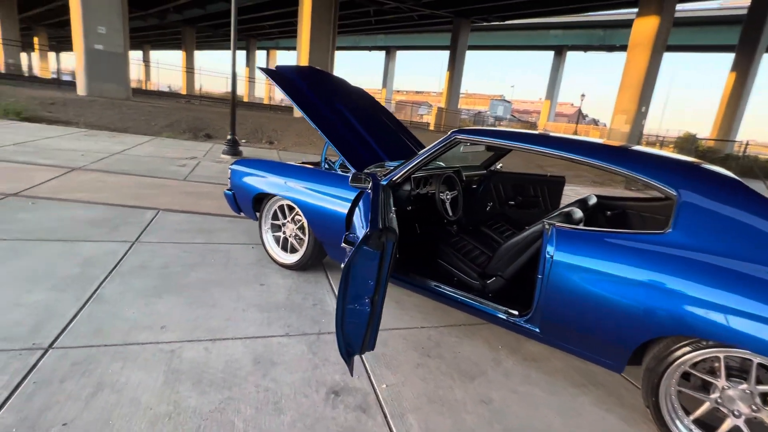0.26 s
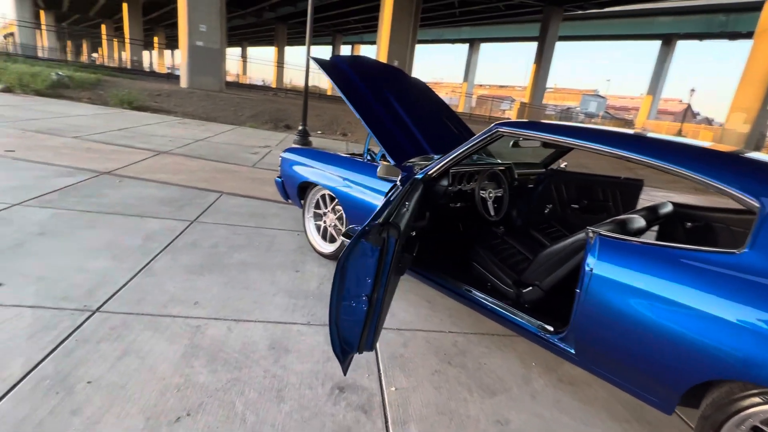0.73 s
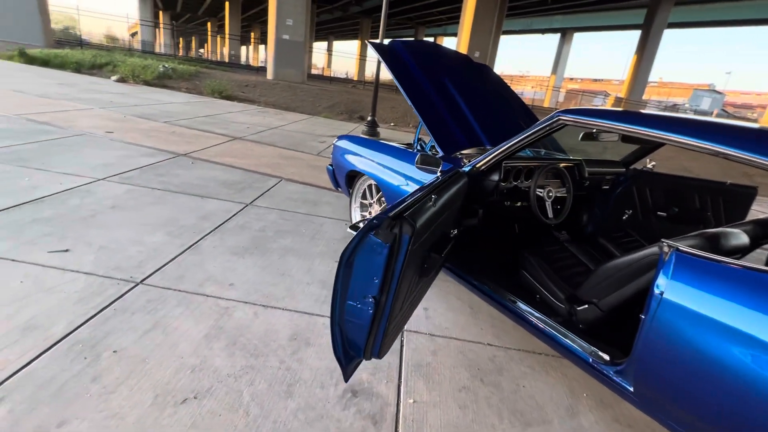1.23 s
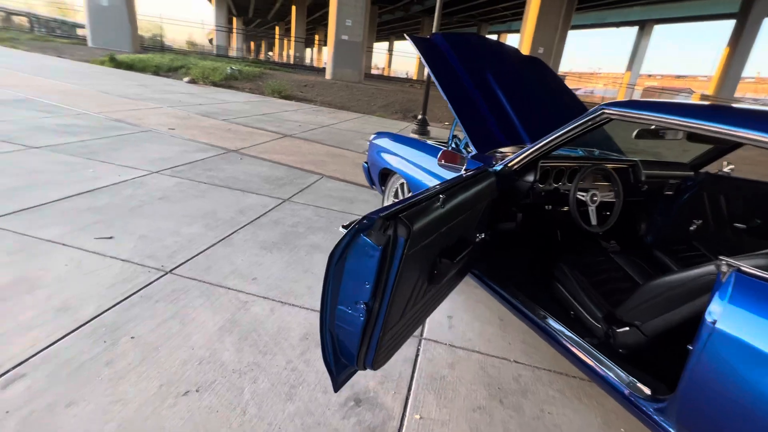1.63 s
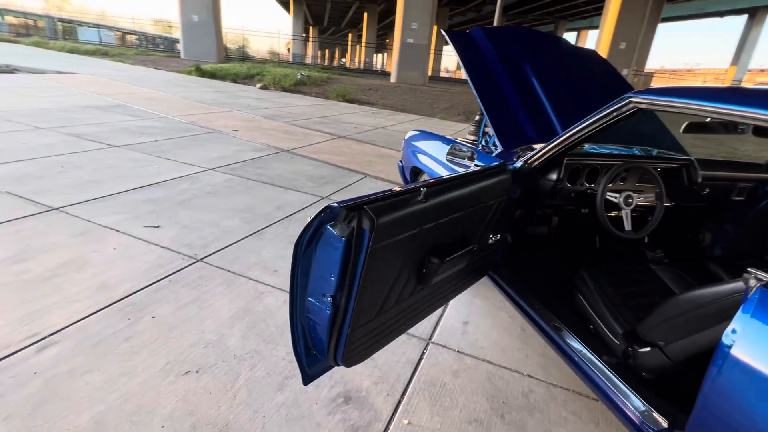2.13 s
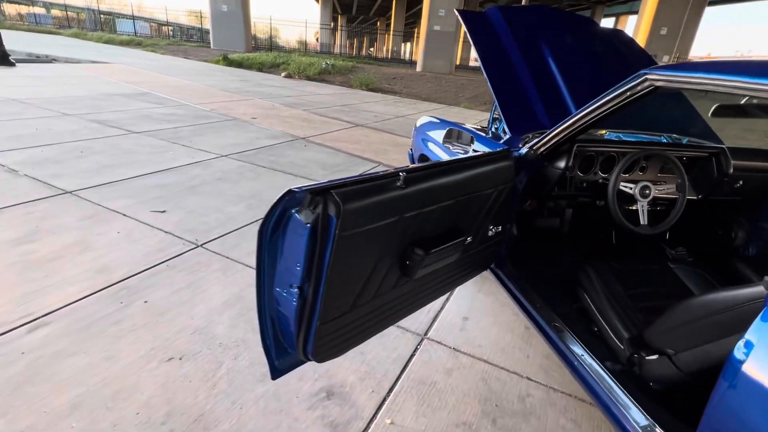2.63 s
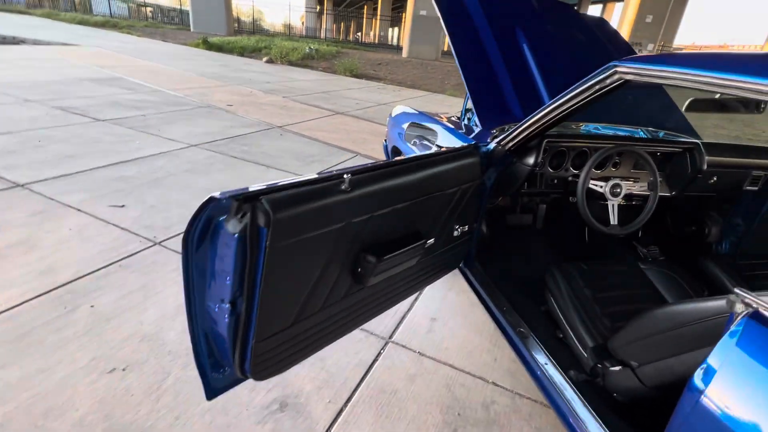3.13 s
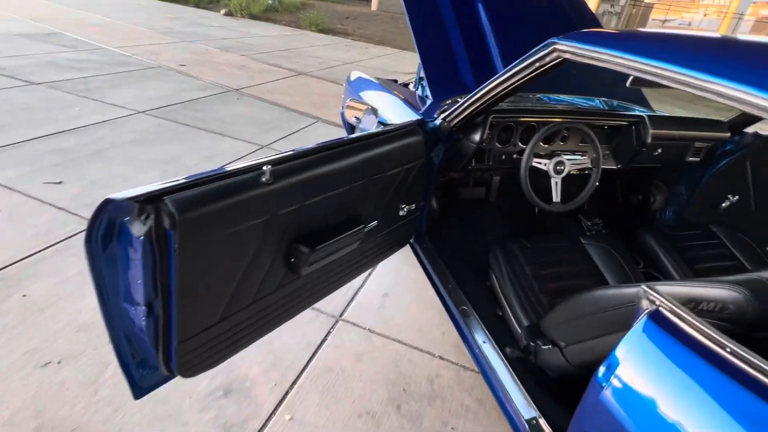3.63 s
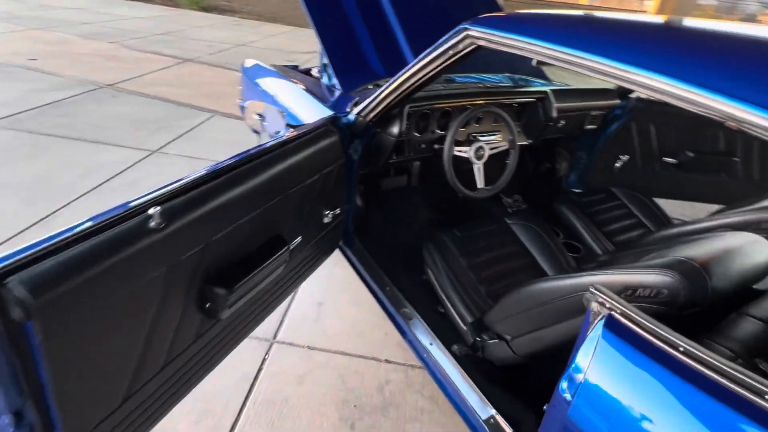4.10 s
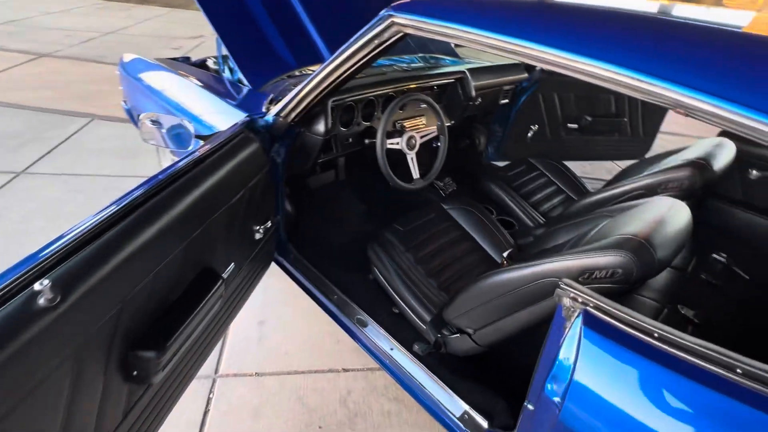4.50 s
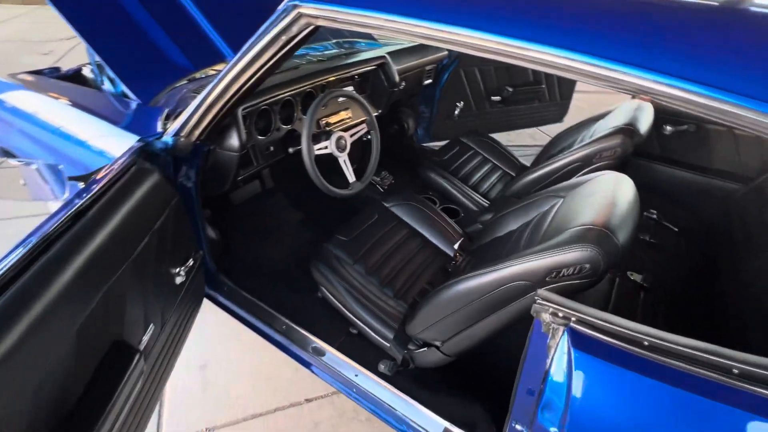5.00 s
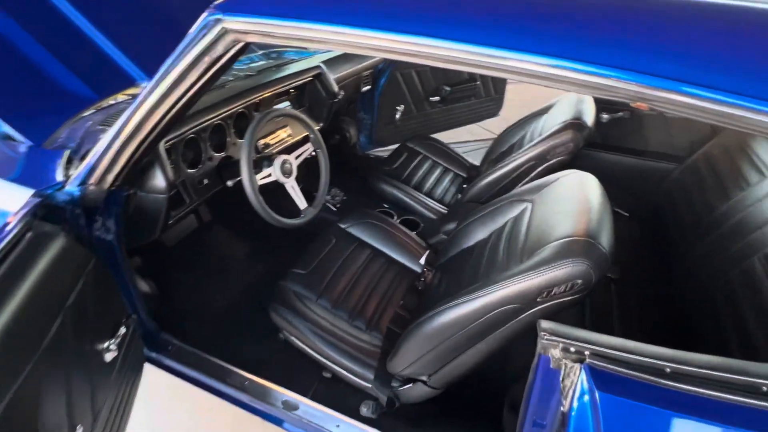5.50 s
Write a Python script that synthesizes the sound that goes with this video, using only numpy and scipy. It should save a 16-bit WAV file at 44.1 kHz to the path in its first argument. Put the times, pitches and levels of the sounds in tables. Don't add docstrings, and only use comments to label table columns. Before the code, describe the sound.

A bass-heavy, continuous roar of vehicles on a deck above, heard from the paved ground through a handheld stereo device. A quick double metallic clank comes early with a diffuse echo, then muffled slab booms, a singing tyre tone strongest near the middle, labouring diesel hum, a deep thud late on, and small handling ticks and cloth brushes.

```python
import sys
import numpy as np
from scipy import signal
from scipy.fft import rfft, irfft, next_fast_len
from scipy.io import wavfile
from scipy.ndimage import uniform_filter1d

SR = 44100
rng = np.random.default_rng(int(sys.argv[2]) if len(sys.argv) > 2 else 0)


def to_wav(s):
    ch = np.atleast_2d(s).T
    pcm = np.round(np.clip(ch, -1, 1) * 32767)
    wavfile.write(sys.argv[1], SR, pcm.astype(np.int16))


def ratio(d):
    e = np.asarray(d, float) / 20
    return 10 ** e


N = 253707

TIME = np.arange(N) / SR
SIZE = next_fast_len(N)
HZ = np.arange(SIZE // 2 + 1) * SR / SIZE + 1e-3


def level(x, db):
    return x * ratio(db) / np.sqrt(np.mean(x ** 2))


def curves(table):
    seconds, *columns = np.transpose(table)
    return [np.interp(TIME, seconds, column) for column in columns]


def over_hz(table):
    hz, value = np.transpose(table)
    return np.interp(np.log(HZ), np.log(hz), value)


def shape(x, gain):
    return irfft(rfft(x, SIZE) * gain, SIZE)[..., :N]


def bell(hz, width_hz):
    return 1 / (1 + 1j * (HZ ** 2 - hz ** 2) / (HZ * width_hz))


def walk(rate):
    hold = int(SR / rate)
    steps = np.repeat(rng.standard_normal(N // hold + 1), hold)
    return 1.3 * uniform_filter1d(uniform_filter1d(steps, hold), hold)[:N]


def swell(s, rise, fall):
    t = TIME - s
    return np.exp(np.where(t < 0, -(t / rise) ** 2, -t / fall))


def swells_db(rows, base_db):
    swells = sum(ratio(db) * np.exp(-((TIME - s) / length) ** 2) for s, db, length in rows)
    return 20 * np.log10(ratio(base_db) + swells)


def note(hz, db, waver_hz, beat_db, rate=12):
    phase = 2 * np.pi * np.cumsum(hz + waver_hz * walk(rate)) / SR
    return np.sqrt(2) * ratio(db + beat_db * walk(rate)) * np.sin(phase)


# frequency in Hz, correlation of left and right from 0 to 1.
PORT_LIKENESS = [(60, 0.96), (100, 1), (180, 0.92), (310, 0.49), (540, 0.34), (930, 0.05), (1600, 0.05),
                 (2770, 0.03)]


def wide_noise():
    like = np.clip(over_hz(PORT_LIKENESS), -.9, .999)
    mid = shape(rng.standard_normal(N), np.sqrt(1 + like))
    side = shape(rng.standard_normal(N), np.sqrt(1 - like))
    return np.array([mid + side, mid - side]) / 2


# frequency in Hz, density in dB per Hz.
TRAFFIC_SPECTRUM = [(15, -50), (28, -18.5), (49, -2), (87, -2.5), (175, -4), (280, -8.5), (450, -16),
                    (560, -20.5), (790, -17.5), (1600, -28), (3300, -46), (4200, -51.5), (8500, -61),
                    (11500, -88)]
# time in seconds, load in dB.
DECK_LOAD = [(0, -3.5), (.4, -5), (.55, 0.5), (.8, -1), (1.05, -0.5), (1.35, 0.5), (1.7, -3), (2.05, -2),
             (2.2, 0.5), (2.7, 1.5), (3.1, 2), (3.5, 1), (3.8, 0), (4.2, 0), (4.8, 0.5), (5.1, -0.5),
             (5.4, 0.2), (5.75, -2.5)]
PART_CENTRES = [55, 190, 1000, 5000]
PART_LOAD_SHARE = [.6, 1, 0.13, 0.12]
PART_HEAVE = [1.2, .6, .4, .4]


def traffic(flutter_db=0.8, gust_db=0.4):
    roar = level(shape(wide_noise(), ratio(over_hz(TRAFFIC_SPECTRUM))), -20.5)
    bins = rfft(roar, SIZE)
    load_db, = curves(DECK_LOAD)
    flow = np.array([share * load_db + heave_db * walk(7)
                     for share, heave_db in zip(PART_LOAD_SHARE, PART_HEAVE)])
    gust = walk(11)
    out = 0
    for octave in np.arange(4, 14.5, .5):
        overlap = np.clip(1 - 2 * np.abs(np.log2(HZ) - octave), 0, 1)
        band = irfft(bins * overlap, SIZE)[:, :N]
        parts = [np.interp(octave, np.log2(PART_CENTRES), one) for one in np.eye(len(PART_CENTRES))]
        treble = np.clip((octave - 8) / 4, 0, 1)
        band_db = parts @ flow + treble * gust_db * gust + flutter_db * walk(12)
        out = out + band * ratio(band_db)
    return out


# time in seconds, pitch in Hz.
TREAD_NOTE_PITCH = [(0, 229.9), (.8, 227.9), (1.3, 238.3), (2, 246.9), (2.9, 253.6), (3.4, 255.3),
                    (4.1, 256), (4.7, 258.7), (5.2, 239.7), (5.753, 224.5)]
# time in seconds, level in dB, length in seconds.
TREAD_NOTE_SWELLS = [(.52, -26, 0.045), (.75, -26, 0.096), (1.08, -31.5, 0.052), (1.21, -22.5, 0.041),
                     (1.3, -30, 0.044), (1.38, -29, 0.11), (1.67, -34, .04), (1.92, -43, .05),
                     (2.5, -33.5, .1), (2.78, -23, 0.046), (2.9, -17.5, .08), (3.14, -20, 0.035),
                     (3.28, -26, 0.06), (3.6, -31, 0.057), (4.1, -35, 0.073), (4.45, -27.5, .1),
                     (4.7, -33.5, .1), (5.05, -30, 0.011), (5.6, -34.5, .07)]
# time in seconds, level in dB, length in seconds.
TREAD_OCTAVE_SWELLS = [(.75, -41, .1), (1.28, -45, .08), (1.65, -43, .1), (2.07, -38, .15), (2.8, -42, .15),
                       (3.09, -34, .05), (3.28, -40, .1)]


def tread_note():
    hz, = curves(TREAD_NOTE_PITCH)
    fundamental = note(hz, swells_db(TREAD_NOTE_SWELLS, -36.5), 2.077, 1.2)
    octave_db = swells_db(TREAD_OCTAVE_SWELLS, -46)
    octave = np.array([note(2 * hz, octave_db, 5.0, 2.5) for _ in "LR"])
    return fundamental + octave


# time in seconds, pitch in Hz.
DIESEL_PITCH = [(0, 55.7), (.8, 55.55), (1.6, 61.85), (2.1, 56.45), (2.45, 60.06), (3.1, 66.02), (3.8, 65),
                (4.1, 58.87), (4.8, 58.5), (5.15, 53), (5.45, 59.2), (5.75, 54.97)]
# time in seconds, level in dB, length in seconds.
DIESEL_SWELLS = [(.65, -35.5, .2), (1.6, -29, 0.13), (2.12, -32, 0.058), (2.43, -24.5, 0.031),
                 (2.65, -30, 0.079), (3.48, -35.5, .15), (4.0, -24.5, .08), (4.4, -25, .07),
                 (4.8, -23, .07), (5.4, -23, 0.15), (5.58, -27, .08), (5.74, -26.5, .04)]


def diesel_hum():
    hz, = curves(DIESEL_PITCH)
    return note(hz, swells_db(DIESEL_SWELLS, -35), 1.476, 0.99)


# time in seconds, blow in dB, rise in seconds, fall in seconds.
AXLE_BLOWS = [
    (.462, -35, .022, .025),
    (0.474, -27.5, 0.009, 0.014),
    (.635, -37, .028, .04),
    (0.647, -27.5, .007, 0.013),
]
# frequency in Hz, density in dB per Hz.
SLAP_SPECTRUM = [(300, -17), (700, -14.5), (1500, 4), (2400, 2), (3300, -13.5), (5000, -22), (8000, -25),
                 (9600, -39), (10500, -53.5)]
# time in seconds, pitch in Hz, level
# in dB, swell and fade in seconds.
STRIKE_RINGS = [(.472, 1100, -33, .012, .025), (.478, 1690, -28, .026, .022), (.47, 1900, -30, .022, .015),
                (.472, 2150, -34, .02, .015), (.474, 2400, -33, .016, .02), (.68, 1236, -25, .035, .03),
                (.655, 1610, -30, .028, .022), (.64, 2020, -31, .02, .02), (.66, 2450, -39, .02, .04),
                (.45, 385, -32, .05, .08), (.62, 365, -30, .06, .08)]
# frequency in Hz, density in dB per Hz.
ECHO_SPECTRUM = [(200, -7), (380, 4.5), (800, 2.5), (1250, 3), (2100, -7), (2450, -5), (3300, -21),
                 (6000, -34), (10000, -59.5)]


def joint_clanks(left_db=6.5, echo_t60_s=2.2, echo_build_s=.05, echo_db=10.5):
    blow = sum(ratio(db) * swell(s, rise, fall) for s, db, rise, fall in AXLE_BLOWS)
    slap = blow * level(shape(wide_noise(), ratio(over_hz(SLAP_SPECTRUM))), 0)
    slap = slap * ratio([[left_db / 2], [-left_db / 2]])
    ring = sum(swell(s, rise, fall) * note(hz, db - .5, 12., 1.8, rate=110)
               for s, hz, db, rise, fall in STRIKE_RINGS)
    decay = ratio(-60 * TIME / echo_t60_s) * (1 - np.exp(-TIME / echo_build_s))
    power = signal.fftconvolve(blow ** 2, decay ** 2)[:N] / np.sum(decay ** 2)
    wash = np.sqrt(np.abs(power)) * level(shape(wide_noise(), ratio(over_hz(ECHO_SPECTRUM))), echo_db)
    return slap + ring + wash


# time in seconds, level in dB, pitch in Hz, length in seconds.
SLAB_THUMPS = [(0.66, -20, 78.7, 0.039), (.745, -16.5, 143, 0.022), (1.9, -22, 250, 0.041),
               (6, -19, 150, 0.041), (2.17, -15, 154, 0.047), (2.272, -18, 97, 0.033),
               (2.448, -36, 57, 0.053), (2.686, -16, 145, 0.03), (4.58, -6, 64, 0.026)]


def slab_thumps(glide=0.085):
    out = np.zeros(N)
    for s, db, hz, length in SLAB_THUMPS:
        t = np.clip(TIME - s, 0, None)
        age = 2 * t / length
        envelope = np.e * age * np.exp(-age)
        sag = 1 - glide * np.tanh(age / 4)
        out += ratio(db) * envelope * np.sin(2 * np.pi * hz * t * sag)
    return out


# time in seconds, pitch in Hz, squeal level in dB, pad hiss level in dB.
BRAKE_WHINE = [(0, 11080, -91, -81.5), (.8, 11090, -84, -79), (1.5, 11070, -80.5, -73),
               (2.2, 10900, -79, -66), (2.9, 10670, -72, -62.5), (3.4, 10610, -76.5, -66.5),
               (3.9, 10500, -78, -65), (4.1, 10300, -75, -66.5), (4.6, 10250, -79, -75),
               (5.0, 10050, -83, -75), (5.753, 10000, -83, -77)]


def brake(width_hz=210, pads_hz=7200):
    hz, squeal_db, pads_db = curves(BRAKE_WHINE)
    smear = shape(rng.standard_normal((2, 2, N)), 1 / (1 + (2 * HZ / width_hz) ** 4))
    phase = 2 * np.pi * np.cumsum(hz) / SR
    squeal = level(smear[0] * np.sin(phase) + smear[1] * np.cos(phase), 0)
    pads = level(shape(rng.standard_normal((2, N)), bell(pads_hz, 2900) ** 2), 0)
    return squeal * ratio(squeal_db) + pads * ratio(pads_db)


# time in seconds, peak in dB, centre in Hz, width in Hz, left minus right in dB.
HANDLING_TICKS = [(2.8015, -22, 1200, 1200, .1), (3.2217, -13, 500, 2500, -3),
                  (3.4247, -32, 8700, 1000, -18), (3.427, -17, 1300, 1300, -6),
                  (3.4266, -44, 9000, 1200, -14), (3.4252, -52, 11500, 3000, -10),
                  (3.425, -29, 4500, 3600, -14), (.843, -46, 7400, 600, -6), (5.3165, -38, 5000, 2000, -6),
                  (5.35, -34, 2000, 2500, -10), (5.4163, -44, 8000, 2500, -14),
                  (5.4166, -25, 1800, 2500, -10), (5.4864, -35, 2800, 1800, -14),
                  (5.5975, -49, 10500, 2000, 5), (5.598, -37, 3300, 1600, -14),
                  (5.631, -40, 3300, 1800, -14)]


def handling_ticks():
    out = np.zeros((2, N))
    for s, db, hz, width_hz, pan_db in HANDLING_TICKS:
        spectrum = np.exp(-((HZ - hz) / width_hz) ** 2 - 2j * np.pi * HZ * s)
        snap = irfft(spectrum, SIZE)[:N]
        out += snap / np.abs(snap).max() * ratio(db + np.array([[pan_db], [-pan_db]]) / 2)
    return out


# time in seconds, length in seconds, level
# in dB, centre in Hz.
SOFT_HISSES = [
    (2.05, .3, -64, 5000),
    (3.88, 0.075, -63, 7000),
    (5.628, 0.047, -65, 5440),
]


def soft_hisses():
    out = np.zeros((2, N))
    for s, length, db, hz in SOFT_HISSES:
        rustle = level(shape(rng.standard_normal((2, N)), bell(hz, hz / 2) ** 2), db)
        out += rustle * np.exp(-((TIME - s) / length) ** 2)
    return out


def scene():
    deck = traffic() + tread_note() + diesel_hum() + joint_clanks() + slab_thumps() + brake()
    return deck + handling_ticks() + soft_hisses()


def top_cut(x):
    return signal.sosfilt(signal.butter(12, 11250, fs=SR, output="sos"), x)


# frequency in Hz, left minus right in dB.
PORT_LEAN = [(60, 0.4), (500, -0.06), (1200, 3), (2400, 0.4), (3700, 6), (5500, 12), (8000, 3.5),
             (10500, -2.5)]


def record(dry):
    lean = ratio(over_hz(PORT_LEAN) / 2)
    left_lag = np.exp(-2j * np.pi * HZ * 0.00019)
    ports = shape(dry, np.array([lean * left_lag, 1 / lean]))
    return top_cut(ports)


dry = scene()
out = record(dry)
to_wav(out)
```